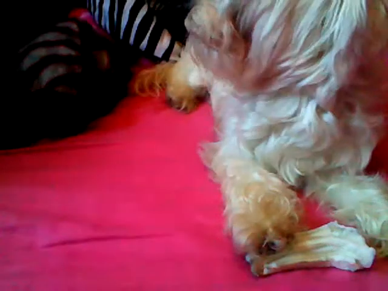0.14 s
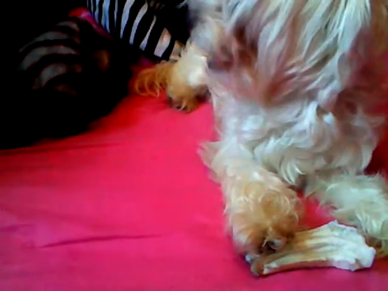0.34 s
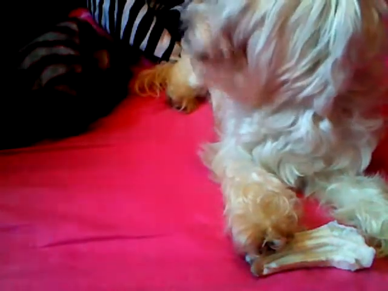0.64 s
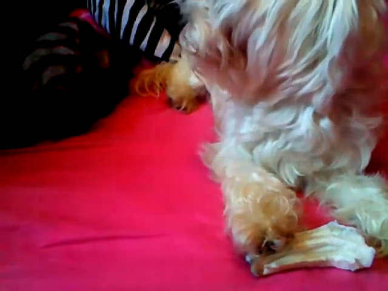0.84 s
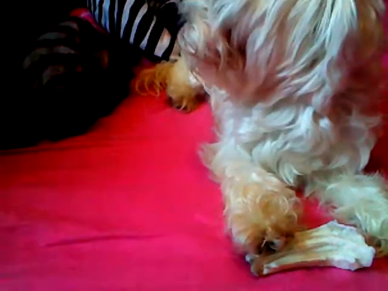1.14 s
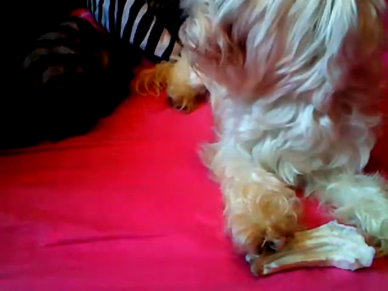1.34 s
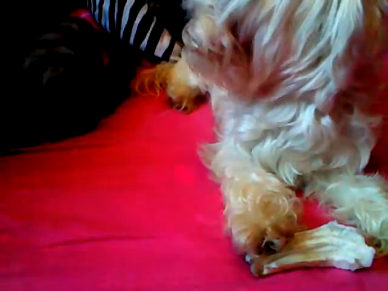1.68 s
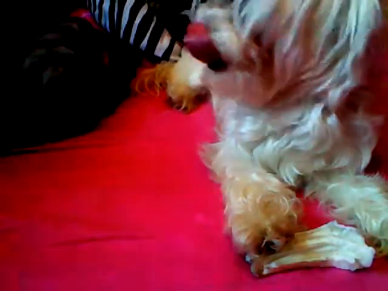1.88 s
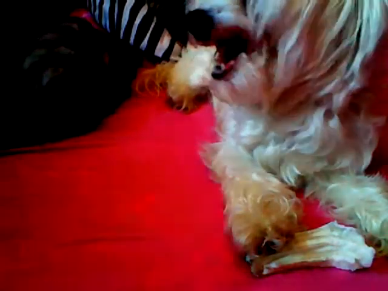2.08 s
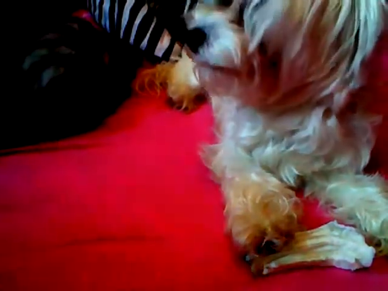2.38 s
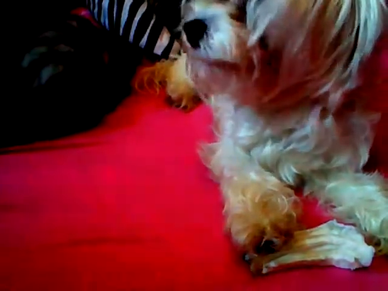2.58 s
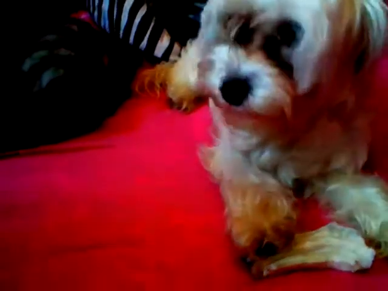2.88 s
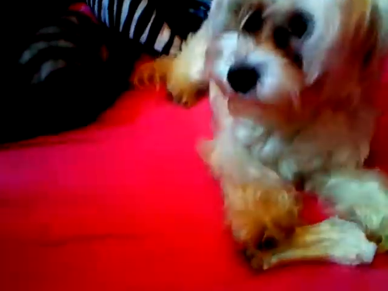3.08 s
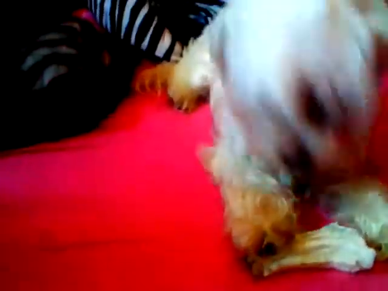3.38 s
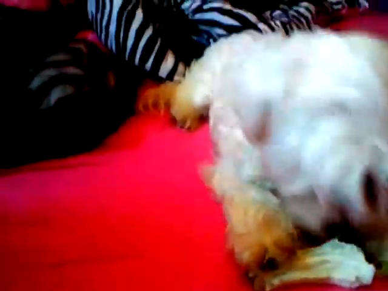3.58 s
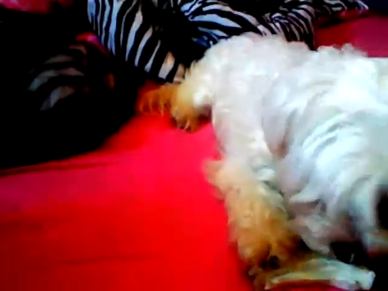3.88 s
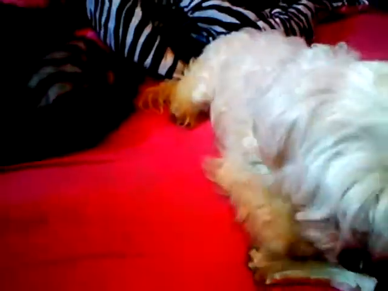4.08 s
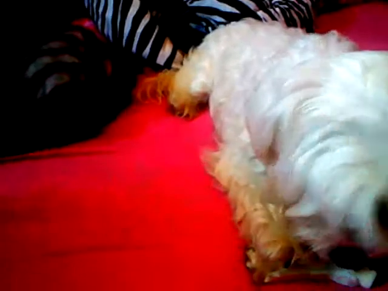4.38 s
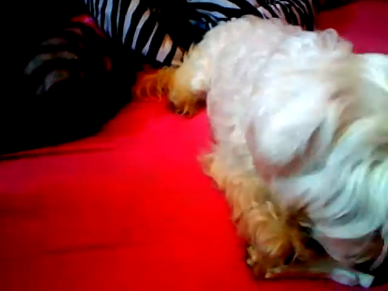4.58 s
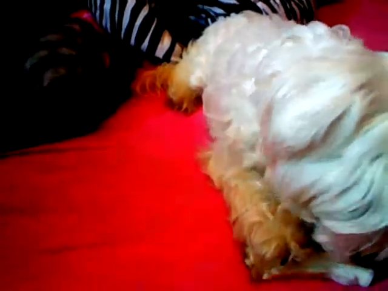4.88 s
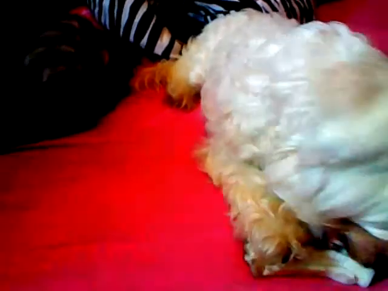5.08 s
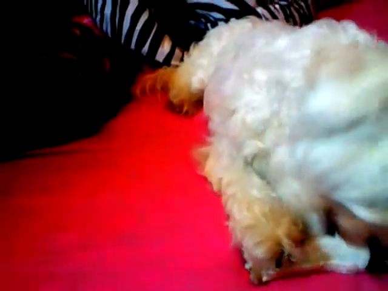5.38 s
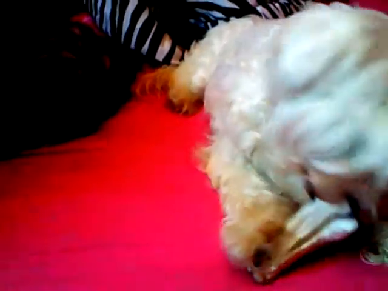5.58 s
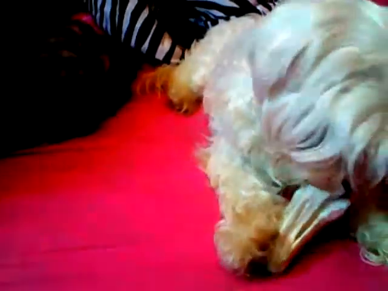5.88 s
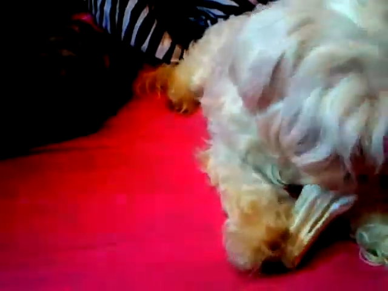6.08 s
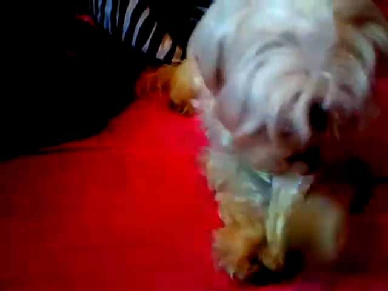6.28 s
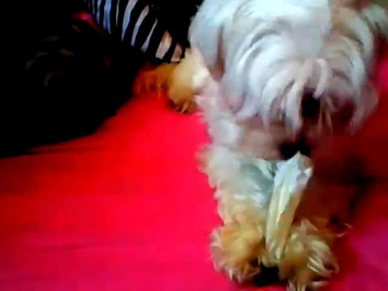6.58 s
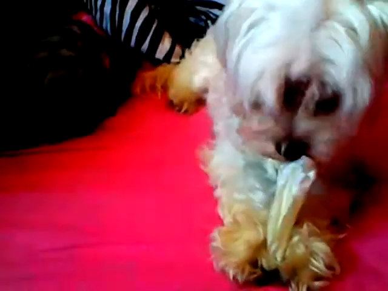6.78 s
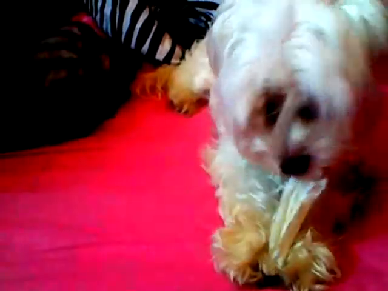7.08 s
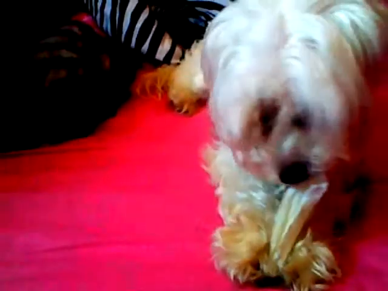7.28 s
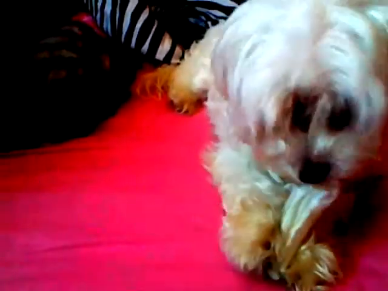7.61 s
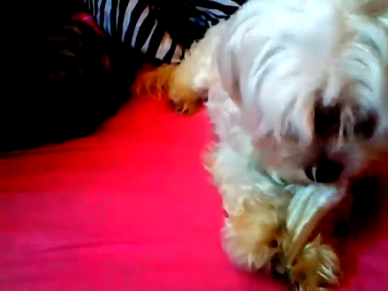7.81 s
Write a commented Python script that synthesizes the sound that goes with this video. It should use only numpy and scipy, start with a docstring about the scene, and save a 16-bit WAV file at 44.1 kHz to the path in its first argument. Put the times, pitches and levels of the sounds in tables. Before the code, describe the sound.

A small dog shifts and gnaws a bone indoors, giving loud sharp cracks and heavy low thumps close up, over a steady fan hum.

```python
"""A dog, a bone and a portable computer

A small dog lies with its bone in front of a portable computer whose built-in microphone listens.
The casing is pushed about: dispersed bursts make its snaps, damped swings its thumps and knocks,
swelling filtered noise its shaking, creaking and rubbing. Short damped swings tick on the bone.
Shaped noise makes the rush of the fan, sines its whistles, the hum of the disk and an electric
whine in bursts; summed harmonics make a faint ticking buzz.
"""
import sys
import numpy as np
from scipy import signal
from scipy.fft import rfft, irfft, next_fast_len
from scipy.io import wavfile
from scipy.ndimage import uniform_filter1d, map_coordinates

SR = 44100
rng = np.random.default_rng(int(sys.argv[2]) if len(sys.argv) > 2 else 0)


def wrap_up_sound(samples):
    """Save the sound to the file named by the first command line argument, as 16-bit audio."""
    columns = np.atleast_2d(samples).T
    # keep every value between -1 and 1, then stretch to whole-number steps
    tamed = np.clip(columns, -1, 1)
    steps = np.round(tamed * 32767).astype(np.int16)
    wavfile.write(sys.argv[1], SR, steps)


N = 350374


def amp(db):
    """Decibel law: level in dB to amplitude gain."""
    return 10 ** (np.asarray(db) / 20)


def unit(x):
    """Normalisation to an rms of 1."""
    return x / np.sqrt(np.mean(x ** 2) + 1e-20)


def along(points, hz):
    """Interpolation of (frequency, value) points on a logarithmic frequency axis."""
    f, v = np.transpose(points)
    return np.interp(np.log(hz + 1), np.log(f + 1), v)


def curves(rows):
    """Linear interpolation in time: one value per sample for each column after the time."""
    s, *cols = np.transpose(rows)
    return [np.interp(np.arange(N) / SR, s, c) for c in cols]


def wobble(rate):
    """Slow random modulation: a smooth curve through `rate` random knots a second."""
    knots = rng.standard_normal(int(N * rate / SR) + 4)
    return map_coordinates(knots, [np.arange(N) * rate / SR])


def filtered(x, response):
    """Linear filtering: the spectrum of x times a complex response of frequency."""
    m = next_fast_len(len(x) + 8192)
    return irfft(rfft(x, m) * response(np.fft.rfftfreq(m, 1 / SR)), m)[:len(x)]


def lowpass(x, edge_hz, order):
    """Zero-phase low-pass filtering with a smooth edge."""
    return filtered(x, lambda f: 1 / (1 + (f / edge_hz) ** order))


def noise(spectrum, lo_hz=0, hi_hz=20000):
    """Spectral shaping: coloured noise whose rms is 1 between the two edges."""
    x = filtered(rng.standard_normal(N), lambda hz: amp(along(spectrum, hz)))
    return x / np.std(filtered(x, lambda hz: (hz >= lo_hz) & (hz < hi_hz)))


def bumps_db(table, hz):
    """Resonant emphasis: bell-shaped lifts of a spectrum in dB."""
    return sum(db * np.exp(-((hz - c) / w) ** 2) for c, w, db in table)


def streaky(x, depth_db):
    """Band-wise modulation: narrow bands swell for some tenths of a second."""
    z = signal.stft(x, nperseg=2048)[2]
    field = uniform_filter1d(rng.standard_normal(z.shape), size=9, axis=1)
    return signal.istft(z * amp(depth_db * unit(field)), nperseg=2048)[1][:N]


def swaying(spectrum, even):
    """Envelope compression: low noise with its swells evened out, like a mass rocking on a spring."""
    x = noise(spectrum)
    envelope = np.abs(signal.hilbert(x, next_fast_len(N))[:N])
    return unit(x / (envelope + 0.15) ** even)


def swells(rows, rise_db_per_s):
    """Exponential rise, hold and decay: one dB curve per level column, the strongest row leading."""
    s, hold, t60, *levels_db = np.transpose(rows)[:, :, None]
    clock = np.arange(0, N / SR, .001)
    t = clock - s
    shape_db = np.minimum(rise_db_per_s * t, 0) - 60 * np.maximum(t - hold, 0) / t60
    return [np.interp(np.arange(N) / SR, clock, (shape_db + db).max(axis=0)) for db in levels_db]


def add(track, s, sound):
    """Superposition: mixes a sound in at time s."""
    part = track[round(s * SR):][:len(sound)]
    part += sound[:len(part)]


# Runs of whine bursts, each at a steady pace: first_burst_s [s], period_s [s]
WHINE_RUNS = [(.002, .04185), (3.007, .0502), (3.964, .0418), (4.297, .0505), (4.398, .0418),
              (6.195, .0335), (6.396, .04186)]
WHINE_HZ, WHINE_DB, BURST_S = 8000, -62.5, .027


def whine():
    """Gated pure tone: an electric whine picked up in bursts whose pace changes in steps."""
    t = np.arange(N) / SR
    first, pace = np.transpose(WHINE_RUNS)
    run = np.maximum(np.searchsorted(first, t) - 1, 0)
    gate = ((t - first[run]) % pace[run] < BURST_S) * 1.
    soft_gate = uniform_filter1d(gate, 60)
    return amp(WHINE_DB) * soft_gate * np.sin(2 * np.pi * WHINE_HZ * t)


BUZZ_HZ, BUZZ_START_S, HARMONIC_DB = 59.27, .0099, -71.0


def screen_buzz():
    """Fourier synthesis: harmonics in phase add up to a faint tick at every screen refresh."""
    t = np.arange(N) / SR - BUZZ_START_S
    orders = np.arange(16, 52)[:, None]
    band = 1 / (1 + ((orders * BUZZ_HZ - 2050) / 450) ** 4)  # strongest near 2050 Hz
    return amp(HARMONIC_DB) * np.sum(band * np.cos(2 * np.pi * orders * BUZZ_HZ * t), axis=0)


# Orders of the disk spindle: pitch_hz [Hz], peak level_db [dB]
DISK_ORDERS = [(89.6, -37.5), (178, -55)]


def disk():
    """Rotational hum: steady sines at the spindle orders, their levels slightly unsteady."""
    t = np.arange(N) / SR
    return sum(amp(db + 0.57 * wobble(3.3)) * np.sin(2 * np.pi * hz * t) for hz, db in DISK_ORDERS)


# Spectrum of the fan's air noise: frequency_hz [Hz], relative density_db [dB per Hz]
AIR_SPECTRUM = [(12, -34), (20, -4), (59, -9.5), (76, -13), (96, -10.5), (116, -18.5), (202, -13),
                (363, -28.5), (393, -26), (724, -24.5), (1140, -21), (2740, -37.5), (7320, -38),
                (8140, -36.5), (11500, -41), (15000, -76), (22000, -120)]
# Resonances of the air path: centre_hz [Hz], width_hz [Hz], lift_db [dB]
DUCT_RESONANCES = [(374, 46, 5), (852, 79, 1.5), (1627, 140, 3.5), (1770, 28, 3)]
# Course of the low part of the rush: time_s [s], relative level_db [dB]
LOW_COURSE = [(0, -46), (.8, -44.5), (2.3, -45.5), (3.2, -41), (5.2, -47), (7.94, -47.5)]
RUSH_DB, AIR_HISS_DB = -48, -54  # gains of the middle and high parts


def rushing_air():
    """Turbulence noise: the fan's stream, coloured by its duct, in three parts."""
    low_db, = curves(LOW_COURSE)
    air = noise(AIR_SPECTRUM, lo_hz=640, hi_hz=2150)
    air = filtered(streaky(air, depth_db=2.5), lambda f: amp(bumps_db(DUCT_RESONANCES, f) - 1.5))
    low = lowpass(air, 300, order=4)
    hiss = air - lowpass(air, 3500, order=4)
    out = amp(low_db - 1.0 + 0.73 * wobble(7.7)) * low
    out += amp(RUSH_DB + 0.63 * wobble(8)) * (air - low - hiss)
    return out + amp(AIR_HISS_DB) * hiss


# Course of the wavering whistle: time_s [s], pitch_hz [Hz], mean level_db [dB]
WHISTLE_COURSE = [(0, 1140, -44), (.15, 1200, -52), (.9, 1181, -62), (1.1, 1133, -52.5), (2.0, 1149, -51.5),
                  (2.4, 1180, -77), (3.75, 1125, -47), (4.2, 1149, -55), (5.5, 1148, -51.5),
                  (5.9, 1131, -53.5), (6.3, 1202, -51), (6.9, 1142, -68), (7.28, 1125, -54),
                  (7.45, 1150, -43), (7.51, 1145, -59), (7.57, 1155, -45), (7.7, 1140, -52.5),
                  (7.94, 1188, -50)]
# Brief soundings of a second thin whistle: full_strength_s [s], hold_s [s], t60_s [s], level_db [dB]
SECOND_WHISTLE = [(.95, 0.019, 2.1, -54), (2.25, .02, .5, -53)]
SECOND_WHISTLE_HZ = 1257


def whistles():
    """Frequency modulation: two thin tones of the fan waver at random in pitch and level."""
    second_db, = swells(SECOND_WHISTLE, rise_db_per_s=180)
    out = np.zeros(N)
    for pitch_hz, db in (curves(WHISTLE_COURSE), (SECOND_WHISTLE_HZ, second_db)):
        cycles = np.cumsum(pitch_hz + 5 * wobble(30)) / SR
        out += amp(db + 3.2 * wobble(9)) * np.sin(2 * np.pi * cycles)
    return out


# Spectra of rubbing, shaking and creaking: frequency_hz [Hz], relative density_db [dB per Hz]
RUB_SPECTRUM = [(180, -30), (300, 1.5), (957, -0.5), (1150, 0), (1490, 3.5), (6250, -19.5), (7620, -27),
                (9430, -21.5), (11500, -35), (15000, -55), (22000, -120)]
SHAKE_SPECTRUM = [(12, -22), (30, -1), (45, -2), (62, -0.5), (90, -4), (120, -15), (160, -60), (260, -120)]
CREAK_SPECTRUM = [(59, -38), (100, -4.5), (167, 2), (237, -14), (284, -13), (455, -18.5), (500, -22.5),
                  (650, -43), (1100, -120)]
# Pushes that shift the machine:
# full_strength_s [s], hold_s [s], t60_s [s], shake level_db [dB], creak level_db [dB]
MACHINE_PUSHES = [(2.47, 0.17, 0.63, -36.5, -29.5), (2.915, 0.028, 0.13, -5.5, -9),
                  (2.965, 0.049, 0.18, -8, -4.5), (3.03, 0.02, .07, -6, -15.5),
                  (3.15, 0.12, .3, -29.5, -30.5), (3.364, .07, 0.16, -25, -26.5),
                  (3.522, .03, .9, -21, -24.5), (3.974, .03, .4, -43, -42), (4.24, 0.033, 0.16, -34, -30.5),
                  (4.39, 0.11, .3, -33.5, -37.5), (4.75, 0.064, 0.63, -22, -23.5),
                  (5.09, .02, 0.41, -30, -28), (5.325, 0.016, 0.46, -22.5, -26.5),
                  (6.034, .09, 0.65, -42, -41.5), (6.41, 0.016, 0.34, -41, -36)]
# Slides over cloth: full_strength_s [s], hold_s [s], t60_s [s], rasp level_db [dB], hiss level_db [dB]
CLOTH_SLIDES = [(2.85, 0.075, 0.71, -48, -56), (3.0, .01, 0.15, -24.5, -50), (4.765, 0.035, 0.16, -40, -52),
                (4.83, 0.26, 0.23, -49.5, -52), (5.27, 0.054, 0.33, -46, -50),
                (5.322, 0.0082, 0.033, -24, -44.5), (6.035, 0.06, .3, -51.5, -73),
                (6.28, .13, 0.47, -53, -72)]
# The rustle follows the creak up to this level, or the rasp, this far below
CREAK_RUSTLES_DB, RUSTLE_DB = -39, -8


def shifting():
    """Friction noise: pushes shake, creak and rustle the machine; slides rasp and hiss as fine grains."""
    grains = noise(RUB_SPECTRUM) * amp(2.7 * wobble(55) + 2.0 * wobble(500))
    rustle = lowpass(grains, 1300, order=6)
    hiss = grains - lowpass(grains, 5000, order=6)
    rasp = grains - rustle - hiss
    shake = swaying(SHAKE_SPECTRUM, even=0.42)
    creak = swaying(CREAK_SPECTRUM, even=0.43) * amp(5.1 * wobble(30))
    shake_db, creak_db = swells(MACHINE_PUSHES, rise_db_per_s=409)
    rasp_db, hiss_db = swells(CLOTH_SLIDES, rise_db_per_s=498)
    rustle_db = np.maximum(np.minimum(creak_db, CREAK_RUSTLES_DB), rasp_db) + RUSTLE_DB
    layers = [(shake_db, shake), (creak_db, creak), (rustle_db, rustle), (rasp_db, rasp), (hiss_db, hiss)]
    return sum(amp(db) * unit(x) for db, x in layers)


def damped_swings(table, t60_s, attack_s, rough, glide):
    """Damped oscillation: a soft start, a pitch that drops at first and an unsteady phase."""
    out, t = np.zeros(N), np.arange(SR // 5) / SR
    for s, db, hz in table:
        drift = rough * np.cumsum(rng.standard_normal(len(t))) * np.sqrt(hz / SR)
        cycles = hz * t + glide * (1 - np.exp(-hz * t))
        swing = np.sin(2 * np.pi * cycles + uniform_filter1d(drift, int(SR / hz / 2)))
        swing = swing * amp(-60 * t / t60_s) * (1 - np.exp(-t / attack_s))
        add(out, s, amp(db) * swing / np.abs(swing).max())
    return out


# Teeth or claws on the bone: start_s [s], peak level_db [dB], settled pitch_hz [Hz]
BONE_TICKS = [(2.354, -41, 2460), (2.5594, -41, 2280), (5.4593, -32, 2440), (5.4955, -34, 2495),
              (5.5215, -36, 2740), (5.6026, -42.5, 2855), (6.2652, -44, 2393), (6.368, -33, 2360),
              (6.3939, -36, 2250), (7.519, -29.5, 2640), (7.5597, -37.5, 2740)]


def bone_ticks():
    """Impact on a small stiff body: high swings that die within hundredths of a second."""
    return damped_swings(BONE_TICKS, t60_s=0.014, attack_s=0.00039, rough=0.57, glide=0.15)


# Dull knocks: start_s [s], peak level_db [dB], settled pitch_hz [Hz]
DULL_KNOCKS = [(2.444, -26, 637), (2.467, -25, 258), (2.498, -29, 1020), (2.538, -32.5, 443),
               (3.133, -25.5, 335), (3.411, -16.5, 198), (3.411, -27, 355), (3.444, -37, 386),
               (3.562, -16.5, 304), (4.439, -28.5, 337), (4.878, -22.5, 232), (5.48, -34, 240),
               (6.031, -24, 272), (6.056, -24, 365), (6.081, -28, 368), (6.417, -35, 200),
               (7.649, -42, 650)]


def knocks():
    """Heavily damped impact: short swings of middle pitch with a rough phase."""
    return damped_swings(DULL_KNOCKS, t60_s=0.08, attack_s=0.0021, rough=1.86, glide=1.08)


# Soft thumps of the whole machine: start_s [s], peak level_db [dB], settled pitch_hz [Hz]
MACHINE_THUMPS = [(2.865, -6, 44.7), (2.916, 1, 59), (3.044, -3.5, 62.6), (3.355, -8.5, 73),
                  (3.409, -12, 38.2), (3.49, -15.5, 65.4), (3.557, -12, 58), (3.951, -14, 51),
                  (3.998, -18, 61.4), (4.392, -20, 95), (4.413, -29, 88), (4.806, -18, 76.7),
                  (4.838, -16, 37.7)]


def thumps():
    """Mass on a spring: the whole machine swings low on its support after a soft start."""
    return damped_swings(MACHINE_THUMPS, t60_s=0.073, attack_s=0.017, rough=0.52, glide=0.065)


# Spectrum of the after-rattle: frequency_hz [Hz], relative density_db [dB per Hz]
RATTLE_SPECTRUM = [(88, -44), (150, 14), (479, -12), (991, -6), (1370, -13.5), (1710, -7), (2590, -16),
                   (3530, -17), (4090, -26.5), (8760, -27.5), (11500, -41), (15000, -97), (22000, -120)]
# Bands that stand out in the rattle: centre_hz [Hz], width_hz [Hz], lift_db [dB]
RATTLE_BANDS = [(1120, 190, 5.5), (1674, 40, -3), (2510, 110, -6), (3650, 100, 3.5), (5350, 210, 5)]
# Decay of the rattle before its final cut-off: frequency_hz [Hz], t60_s [s]
RATTLE_DECAY = [(300, 0.17), (2000, 0.28), (5000, 0.23), (10000, .08)]


def rattle(ends_s, ripple_db):
    """Reverberant decay in the shell: other bands ring each time, treble dies first, the end is ragged."""
    hz, t, z = signal.stft(rng.standard_normal(SR // 8), SR, nperseg=512, noverlap=384)
    bands = unit(uniform_filter1d(rng.standard_normal((2, len(hz))), size=4))[:, :, None]
    colour_db = (along(RATTLE_SPECTRUM, hz) + bumps_db(RATTLE_BANDS, hz))[:, None]
    decay_db = -60 * t / along(RATTLE_DECAY, hz)[:, None]
    shape = amp(colour_db + ripple_db * bands[0] + decay_db)
    cutoff = 1 + (t / ends_s / amp(1.0 * bands[1])) ** 8  # each band ends at its own time
    tail = signal.istft(z * shape / cutoff, SR, nperseg=512, noverlap=384)[1]
    return tail / np.std(tail[:SR // 40])


# Snaps of the casing: time_s [s], body peak level_db [dB],
# treble re body_db [dB], low knock re body_db [dB]
CASING_SNAPS = [(0.332, -39, -6, 1), (0.378, -51, 13.5, -1), (2.461, -14.5, -12, -18), (2.85, -25.5, -1, 5),
                (2.859, -31.5, 6, -1), (2.871, -27, -11, 4), (2.884, -25, -6, -15), (2.907, -2.5, -15, -7),
                (2.927, -15, -6, -3), (2.958, 2, 1.5, -5), (2.965, -6, -10, -3), (2.979, -7.5, -7, 5),
                (3.045, -13.5, -22, -9), (3.16, -1, -6, -5), (3.345, -24, -19.5, -10),
                (3.358, -25.5, -8, 0), (3.377, -28, -7, -11), (3.515, -6.5, 0.5, -4),
                (3.536, -10.5, -15, -20), (3.551, -3, -9, -7), (3.634, -2, -3, -9.5), (3.671, -9, -20, -15),
                (4.221, -13, -4.5, -3.5), (4.281, -32, -5, 3), (4.399, -33, 1.5, 3), (4.48, 1.5, -9, -7.5),
                (4.695, -39.5, -3, 0), (4.744, -1, -6.5, -6), (4.753, -10, -11, 1.5),
                (4.768, -17, 5.5, 4.5), (4.821, -1.5, -3.5, -4.5), (5.091, -4.5, -4.5, -4),
                (5.259, -29, -10, 5.5), (5.326, -9, -14, -26), (7.518, -44.5, 10, -18)]
# Modes of the casing: centre_hz [Hz], width_hz [Hz], mean level_db [dB]
CASING_MODES = [(279, 202, 10.5), (1230, 380, 5), (1610, 347, 3.5), (2970, 42, -5)]
# Bright edge of a snap: frequency_hz [Hz], relative density_db [dB per Hz]
BRIGHT_EDGE = [(1500, -38), (2300, 0), (3600, -8), (5200, -4), (8000, -13.5), (10800, -15), (12000, -60),
               (22000, -120)]
# After-rattle of a full-scale snap; dB per dB of peak; dB per dB of treble
RATTLE_DB, RATTLE_GROWS, RATTLE_FOLLOWS = -19, 0.72, 0.59


def snaps():
    """Bending-wave dispersion: a burst of slips crosses the shell and its high tones arrive first."""
    out, t = np.zeros(N), np.arange(SR // 20) / SR
    for s, db, treble_db, knock_db in CASING_SNAPS:
        slips = rng.standard_normal(len(t)) * amp(-60 * t / 0.012) * np.minimum(t / 0.00094, 1) ** 2
        spread = 0.077 * amp(rng.normal(0, 1))  # delay in s = spread / root of frequency
        sizes_db = rng.normal(0, 3.6, len(CASING_MODES))

        def travel(f):
            return np.exp(-4j * np.pi * spread * np.sqrt(f))

        def shell(f):
            modes = enumerate(CASING_MODES)  # neighbours swing in opposite phase
            return travel(f) * sum((-1) ** k * amp(g + sizes_db[k]) * 1j * f * w
                                   / (c * c - f * f + 1j * f * w) for k, (c, w, g) in modes)

        wave = filtered(slips, shell)
        low = lowpass(wave, 480, order=6)
        body = lowpass(wave, 3300, order=6) - lowpass(wave, 700, order=6)
        high = filtered(slips * amp(-60 * t / 0.16), lambda f: amp(along(BRIGHT_EDGE, f)) * travel(f))
        parts = ((body, 0), (high, treble_db), (low, knock_db))
        add(out, s - .0016, sum(amp(db + d) * p / np.abs(p).max() for p, d in parts))

        tail = rattle(ends_s=0.074, ripple_db=4.5)
        tail_db = RATTLE_DB + RATTLE_GROWS * db + RATTLE_FOLLOWS * treble_db
        fade_in = np.minimum(np.arange(len(tail)) / (0.00083 * SR), 1)
        add(out, s + .002, amp(tail_db) * tail * fade_in)
    return out


def scene():
    """Superposition of all sources at the one microphone."""
    background = whine() + screen_buzz() + disk() + rushing_air() + whistles()
    handling = shifting() + bone_ticks() + knocks() + thumps() + snaps()
    return (background + handling)[None]


TOP_HZ = 11300


def record(dry):
    """Saturation and band limiting: the input clips at full scale and loses what lies above its limit."""
    clipped = dry[0] / (1 + np.abs(dry[0]) ** 12) ** (1 / 12)
    limited = filtered(clipped, lambda hz: (hz < 1.025 * TOP_HZ) / (1 + (hz / TOP_HZ) ** 60))
    return np.clip(limited, -1, 1)[None]


dry = scene()
out = record(dry)
wrap_up_sound(out)
```